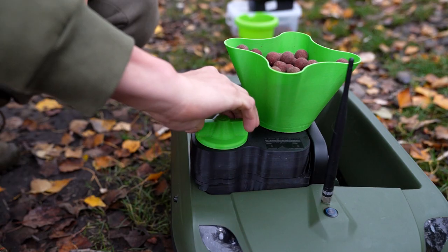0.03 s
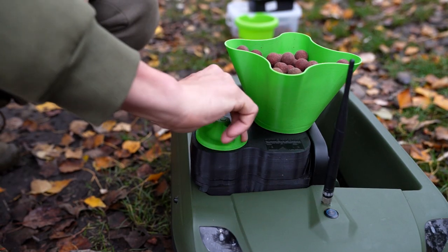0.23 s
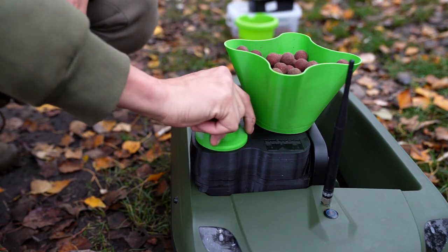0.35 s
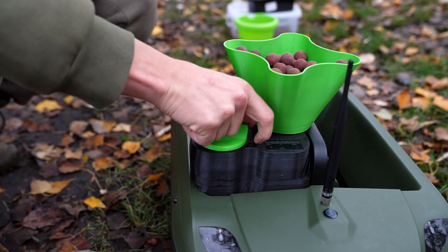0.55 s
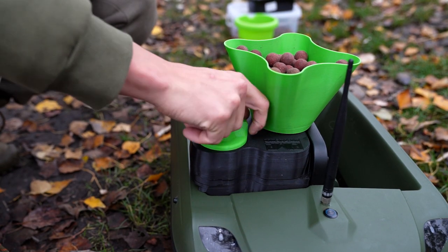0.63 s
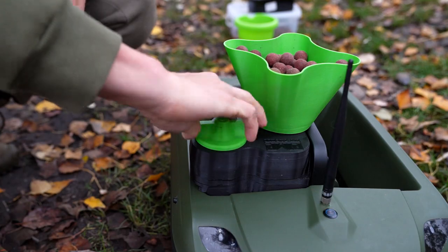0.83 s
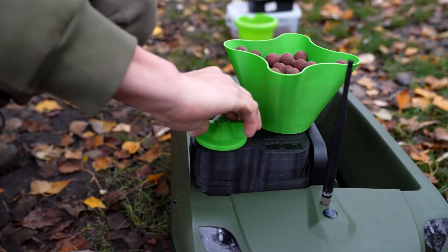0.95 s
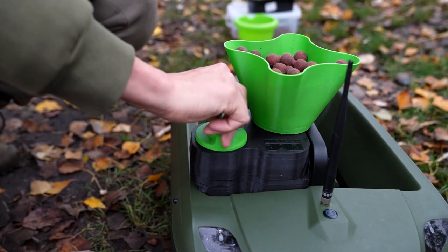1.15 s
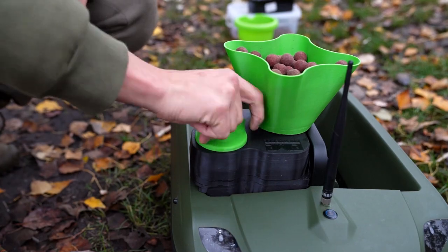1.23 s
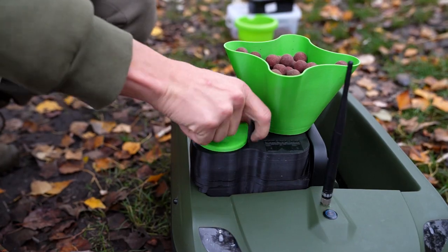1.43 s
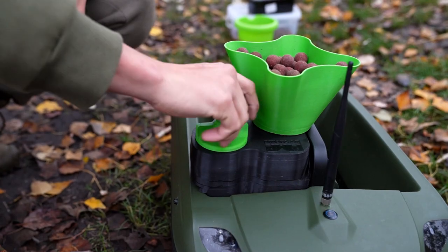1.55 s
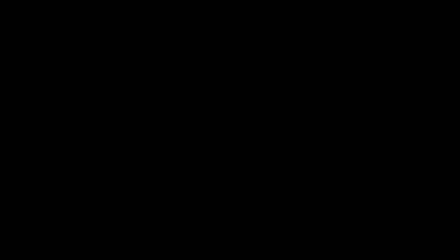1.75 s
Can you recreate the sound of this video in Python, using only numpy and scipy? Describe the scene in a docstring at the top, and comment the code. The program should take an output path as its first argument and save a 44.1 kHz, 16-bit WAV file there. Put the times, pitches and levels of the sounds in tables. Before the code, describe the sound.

Two quick runs of loud ratchet clicks from a hand-wound knob on hollow plastic.

```python
"""A plastic ratchet knob, wound by hand on a hollow plastic boat hull: two twists of twelve clicks.
Outdoors, one microphone close to the knob, near enough to overload on the clicks.
Each twist takes up the slack with a knock; the pawl snaps over the teeth and rings housing and hull.
Between twists the knob knocks back, fingers slide to a new grip and it ticks once.
Faint hiss and a light wind lie behind."""
import sys
import numpy as np
from scipy import signal
from scipy.fft import rfft, irfft
from scipy.io import wavfile
from scipy.ndimage import uniform_filter1d

SR = 44100
rng = np.random.default_rng(int(sys.argv[2]) if len(sys.argv) > 2 else 0)


def store_pcm(level_fs):
    """Save levels as 16-bit WAV."""
    pcm = np.round(np.clip(level_fs, -1, 1) * 32767).astype(np.int16)
    wavfile.write(sys.argv[1], SR, np.atleast_2d(pcm).T)


N = 79380
T = np.arange(N) / SR

# the pawl drops off a tooth: (t/s, pawl f/Hz, pawl level/dB, housing level/dB, crack level/dB)
TOOTH_DROPS = [(0.2498, 2213, 1, 0.5, 0), (0.2745, 2920, 6.5, -7, 1.5), (0.2963, 3060, 3.5, -1.5, 1),
               (0.3174, 3020, 3.5, -3.5, 4), (0.3395, 2070, -7, 2, 2), (0.3653, 1860, -7, 5.5, 4),
               (0.3925, 3960, 1, 3.5, 0.5), (0.4209, 2430, -0.5, -2.5, 5), (0.4469, 2980, -26, -1, 3),
               (0.4705, 3900, -21, 3.5, 3.5), (0.5026, 1835, 4, 2.5, 2.5), (0.549, 1730, -11.5, 2.5, 0),
               (1.113, 2580, -2.5, -2.5, 3), (1.1391, 2620, -4, -2, 3.5), (1.1592, 3150, 5.5, 2, 5),
               (1.1792, 2260, -13, 2, 4.5), (1.201, 1640, -30, 0, 5.5), (1.2225, 3010, 6, -6, 1),
               (1.2463, 2750, 2.5, -11, 3), (1.27, 2520, 2.5, 0, 2.5), (1.2931, 2516, 1, 0, 0),
               (1.3137, 2050, -3.5, 4, 2.5), (1.3387, 2480, 0.5, 0, -0.5), (1.397, 2400, 1.5, 2, 0.5)]
# spectrum of the crack: (f/Hz, level/dB)
CRACK_COLOUR = [(600, -37), (2000, 1), (4500, 4), (6000, -15), (8300, -2.5), (10500, -14.5), (12800, -9.5),
                (16000, -22)]
# the hard first snap, gone within a few cycles: (f/Hz, level/dB)
SNAP_MODES = [(850, -14.5), (4300, -7), (8300, -14), (12800, -17.5)]
# housing modes: (f/Hz, level/dB)
HOUSING_MODES = [(1020, -17), (1560, -13), (1950, -10), (2350, -10.5), (2900, -12), (3450, -12.5),
                 (3900, -14.5), (4550, -18)]
# what rings on in the hull after a click: (f/Hz, level/dB)
TAIL_COLOUR = [(260, -21), (500, -3), (1000, -4.5), (1550, 0.5), (2400, -1), (4200, -12), (6000, -25.5),
               (8200, -20.5), (10500, -31), (13000, -22), (16000, -43)]

def ratchet():
    """Close to the microphone, the pawl scrapes over each crest, drops and rings housing and hull."""
    cracks = [(s, db - 9.5) for s, *_, db in TOOTH_DROPS]
    scrapes = [(s - .0011, -28.5) for s, *_ in TOOTH_DROPS]
    clicks = bursts(cracks, CRACK_COLOUR, fall_s=.0018) + bursts(scrapes, CRACK_COLOUR, fall_s=.0018)
    for s, hz, pawl_db, housing_db, crack_db in TOOTH_DROPS:
        add(clicks, s, from_db(crack_db) * strike(SNAP_MODES, swell_s=.00068, steepness=4.7))
        pawl = from_db(pawl_db) * ring(hz, swell_s=.00094, steepness=2.25, sag=.11)
        housing = from_db(housing_db) * strike(HOUSING_MODES, swell_s=.0011, dispersion=.15)
        add(clicks, s + .00019, pawl + housing)
    echo = from_db(-14.5) * np.interp(T - .0027, T, clicks)   # off the hopper beside the knob
    hull_hits = [(s, housing_db / 2) for s, _, _, housing_db, _ in TOOTH_DROPS]
    early_tail = from_db(-13) * bursts(hull_hits, TAIL_COLOUR, fall_s=.0069)
    late_tail = from_db(-35) * bursts(hull_hits, TAIL_COLOUR, fall_s=.037)
    return clicks + echo + early_tail + late_tail


# the knob knocks against its play: (t/s, level/dB, contact f/Hz, hollow level/dB)
SLACK_KNOCKS = [(.2015, -16, 1030, -7), (.6370, -7.5, 1110, -14), (.6430, -7, 1470, -7.5),
                (0.9691, -31, 830, -16), (1.0612, -12, 960, -1), (1.419, -22, 2470, -6),
                (1.501, -9, 1130, -2), (1.5053, -2, 1645, -11), (1.5057, -14, 3220, -34),
                (1.7163, -23.5, 820, -10)]
# hull wall modes: (f/Hz, level/dB)
WALL_MODES = [(490, -17), (715, -16), (890, -15.5), (1280, -13.5), (1490, -27.5), (1790, -17),
              (2330, -27.5), (3800, -36.5)]
# slow modes of the hollow hull: (f/Hz, level/dB)
HOLLOW_MODES = [(245, -20), (295, -20), (360, -33.5), (470, -26)]

def knocks():
    """Dull contacts at the knob rattle and ring the wall, then the hollow behind it."""
    out = bursts([(s, db - 12.5) for s, db, _, _ in SLACK_KNOCKS], WALL_MODES, fall_s=.0052)
    for s, db, hz, hollow_db in SLACK_KNOCKS:
        contact = ring(hz, swell_s=.00064)
        wall = from_db(-3.5) * strike(WALL_MODES, swell_s=.0048, dispersion=.15)
        hollow = strike(HOLLOW_MODES, swell_s=.0075)
        add(out, s, from_db(db) * (contact + wall) + from_db(hollow_db) * hollow)
    return out


# ticks as the grip changes: (t/s, level/dB)
GRIP_TICKS = [(0.8374, 0), (0.863, -30), (1.498, -24), (1.6901, -8), (1.760, -30.5)]
# their modes: (f/Hz, level/dB)
GRIP_TICK_MODES = [(950, -11.5), (1500, -9.5), (2300, -12), (4500, -5), (8300, -13.5)]

def ticks():
    """The unloaded knob clicks, light and dry, with a faint rattle of the wall."""
    out = bursts([(s, db - 14) for s, db in GRIP_TICKS], CRACK_COLOUR, fall_s=.0026)
    out += bursts([(s, db - 20.5) for s, db in GRIP_TICKS], WALL_MODES, fall_s=.0052)
    for s, db in GRIP_TICKS:
        add(out, s, from_db(db) * strike(GRIP_TICK_MODES, swell_s=.00041))
    return out


# course of the grinding: (t/s, level/dB)
SHAFT_LEVEL = [(.19, -58), (.215, -36), (.30, -56), (.42, -29.5), (.52, -26), (.57, -50), (.61, -40.5),
               (1.04, -63), (1.075, -30.5), (1.17, -18.5), (1.33, -31.5), (1.42, -36), (1.47, -44)]
# its spectrum: (f/Hz, level/dB)
SHAFT_COLOUR = [(100, -43), (250, 2), (1500, 2.5), (2500, -4), (4200, -8.5), (6000, -24), (8300, -16.5),
                (11000, -36), (16000, -32)]

def shaft():
    """Under the clicks, the knob sticks and slips on its shaft."""
    return level(SHAFT_LEVEL) * grain(rough_db=3, size=130) * noise(SHAFT_COLOUR)


# course of the sliding: (t/s, level/dB)
FINGER_LEVEL = [(.665, -50), (.683, -36), (.71, -37.5), (.735, -54), (.753, -30), (.77, -28.5), (.784, -36),
                (.789, -60), (.833, -47), (.84, -75), (1.50, -62), (1.555, -35), (1.575, -51),
                (1.628, -29.5), (1.637, -72)]
# its spectrum: (f/Hz, level/dB)
FINGER_COLOUR = [(300, 20), (550, 22.5), (820, 15.5), (1400, 1.5), (2400, 14), (4000, 8), (6000, 2),
                 (8300, 6.5), (11000, -8.5), (14000, 0), (16000, -27)]
# short squeaks: (t/s, level/dB, f/Hz)
SKIN_SQUEAKS = [(.767, -31.5, 2400), (1.554, -20.5, 2060), (1.607, -26.5, 2250), (1.624, -24.5, 2220),
                (1.627, -29.5, 4100)]

def fingers():
    """Fingers slide over the plastic near the microphone and squeak where the skin catches."""
    out = level(FINGER_LEVEL) * grain(rough_db=3.5, size=60) * noise(FINGER_COLOUR)
    for s, db, hz in SKIN_SQUEAKS:
        add(out, s, from_db(db) * ring(hz, swell_s=.0015))
    return out


# course of the hull's murmur: (t/s, level/dB)
MURMUR_LEVEL = [(.05, -40), (.18, -73), (.24, -28.5), (.56, -29.5), (.62, -49), (.69, -35.5), (.81, -42.5),
                (1.04, -43), (1.12, -32), (1.42, -33), (1.48, -41), (1.53, -31), (1.62, -31.5), (1.66, -60),
                (1.8, -43)]
# its spectrum: (f/Hz, level/dB)
MURMUR_COLOUR = [(80, -31), (160, -3), (230, 2.5), (320, 4.5), (430, -4.5), (750, -8.5), (1200, -23.5),
                 (3000, -22)]
# soft bumps: (t/s, level/dB, f/Hz)
HAND_BUMPS = [(.660, -19.5, 320), (0.687, -23.5, 249), (0.867, -25, 295), (0.925, -30, 255)]

def hand_on_hull():
    """The hollow hull murmurs under the hand and booms when bumped."""
    out = level(MURMUR_LEVEL) * noise(MURMUR_COLOUR)
    for s, db, hz in HAND_BUMPS:
        add(out, s, from_db(db) * ring(hz, swell_s=.005))
    return out


# spectrum of the open air: (f/Hz, level/dB)
AIR_COLOUR = [(100, -6), (400, -15.5), (1200, -18.5), (3000, -30), (8000, -36.5), (16000, -39.5)]
# course of the wind: (t/s, level/dB)
WIND_LEVEL = [(0, -28.5), (.55, -31.5), (.8, -25), (1, -33), (1.5, -32), (1.8, -40.5)]
# its spectrum: (f/Hz, level/dB)
RUMBLE_COLOUR = [(14, 10), (30, -12), (55, -21), (90, -26), (250, -42)]

def outdoors():
    """Around the boat, faint hiss and a light wind rumble."""
    return from_db(-46.5) * noise(AIR_COLOUR) + level(WIND_LEVEL) * noise(RUMBLE_COLOUR)


def from_db(db):
    """Decibels to gain."""
    return 10 ** (np.asarray(db) / 20)


def level(rows):
    """Gain over time from (t/s, level/dB) points; silent before the first."""
    return from_db(np.interp(T, *np.transpose(rows), left=-np.inf))


def noise(colour):
    """Steady noise of rms 1, shaped by a (f/Hz, level/dB) spectrum."""
    hz, db = np.transpose(colour)
    f = np.maximum(np.fft.rfftfreq(N, 1 / SR), 1)
    gain = from_db(np.interp(np.log(f), np.log(hz), db, left=-np.inf, right=-np.inf))
    x = irfft(rfft(rng.standard_normal(N)) * gain, N)
    return x / x.std()


def grain(rough_db, size):
    """Uneven gain of a sticking and slipping contact, smoothed over size samples."""
    wobble = uniform_filter1d(rng.standard_normal(N), size)
    gain = from_db(rough_db * wobble / wobble.std())
    return gain / np.sqrt(np.mean(gain ** 2))


def add(out, s, sound):
    """Mix a sound in at time s."""
    i = max(int(s * SR), 0)
    out[i:i + len(sound)] += sound[:N - i]


def ring(hz, swell_s, steepness=1, sag=0):
    """A resonance swells to 1 and dies; a steeper one is shorter, a sagging one starts sharp."""
    t = T[:N // 8]
    cycles = hz * (t + sag * t * (1 - t / swell_s / 2))
    envelope = (t / swell_s * np.exp(1 - t / swell_s)) ** steepness
    return envelope * np.sin(2 * np.pi * (cycles + rng.random()))


def strike(modes, swell_s, dispersion=0, steepness=1):
    """One blow on a set of modes, never twice alike; dispersion makes high ones come and go sooner."""
    out = 0
    for hz, db in modes:
        gain = from_db(db + 2 * rng.normal())
        detuned_hz = hz * (1 + .042 * rng.normal())
        out += gain * ring(detuned_hz, swell_s * (modes[0][0] / hz) ** dispersion, steepness)
    return out


def bursts(hits, colour, fall_s):
    """Dense, dying vibration after each (t/s, level/dB) hit."""
    power = np.zeros(N)
    for s, db in hits:
        add(power, s, from_db(db) ** 2 * np.exp(-2 * T[:N // 4] / fall_s))
    return np.sqrt(power) * noise(colour)


def scene():
    """Knob, hand and open air at one close microphone."""
    return (ratchet() + knocks() + ticks() + shaft() + fingers() + hand_on_hull() + outdoors())[None]


START_S, OVERLOAD_KNEE, CUTOFF_HZ = .0454, 3.4, 16000

def record(dry):
    """The sound begins after a short silence, overloads softly at full scale and loses the top of the treble."""
    x = dry * np.clip((T - START_S) / .00055, 0, 1)
    x = x / (1 + np.abs(x) ** OVERLOAD_KNEE) ** (1 / OVERLOAD_KNEE)
    return signal.sosfilt(signal.ellip(10, .1, 70, CUTOFF_HZ, fs=SR, output="sos"), x)


dry = scene()
out = record(dry)
store_pcm(out)
```